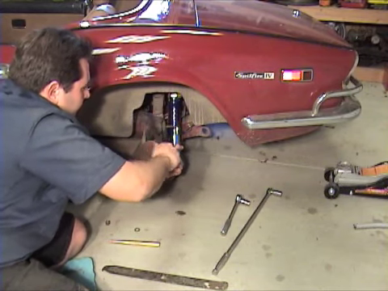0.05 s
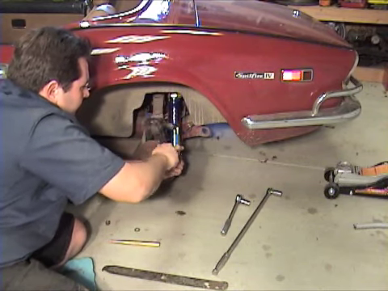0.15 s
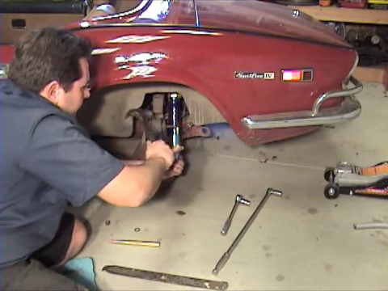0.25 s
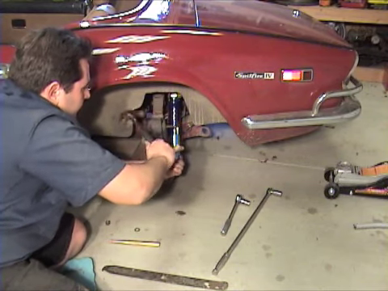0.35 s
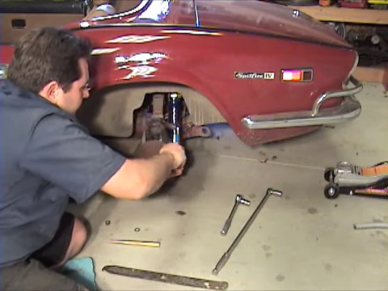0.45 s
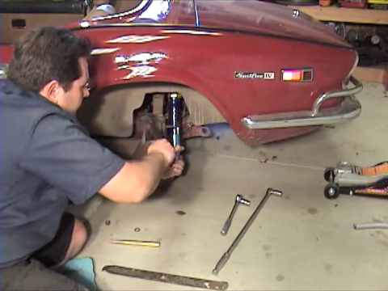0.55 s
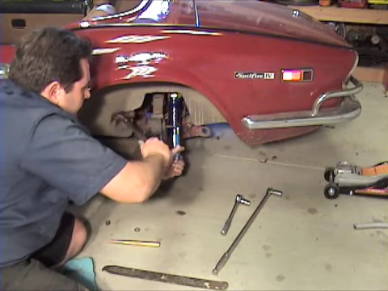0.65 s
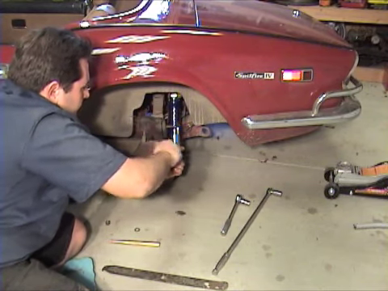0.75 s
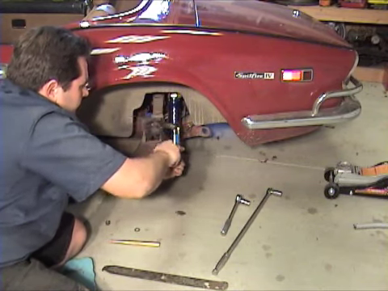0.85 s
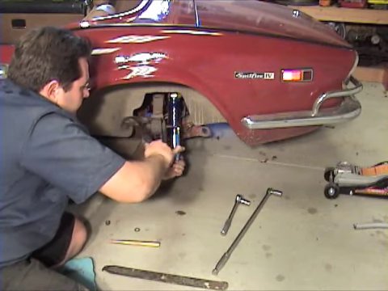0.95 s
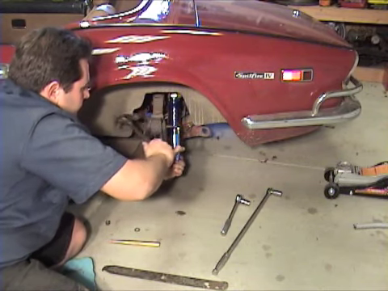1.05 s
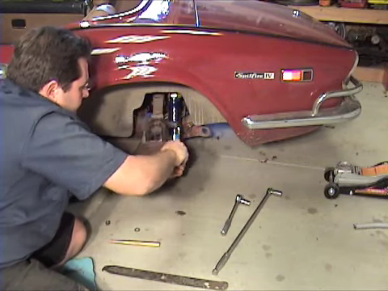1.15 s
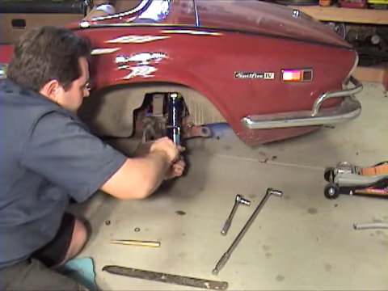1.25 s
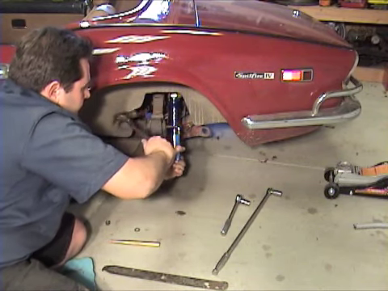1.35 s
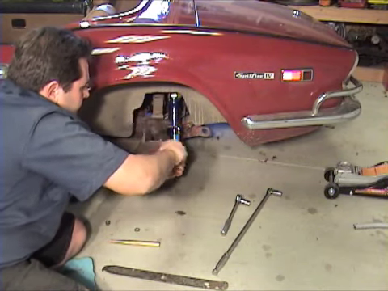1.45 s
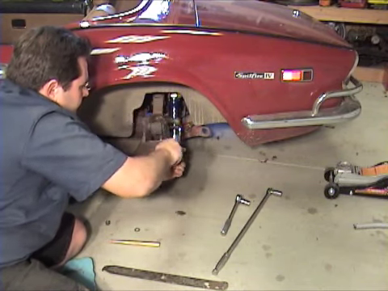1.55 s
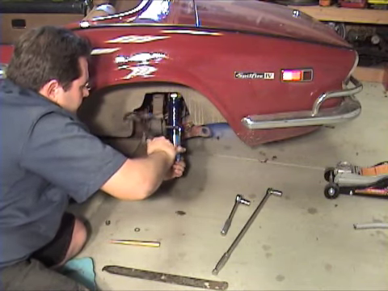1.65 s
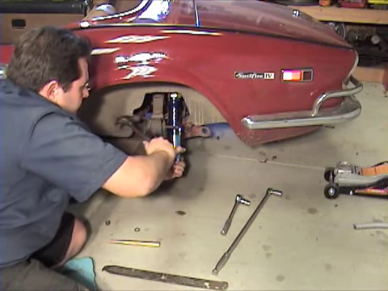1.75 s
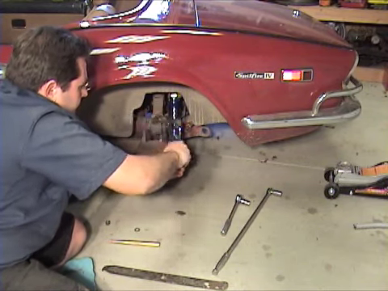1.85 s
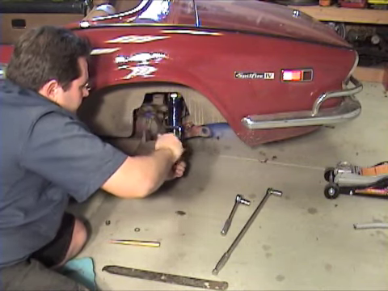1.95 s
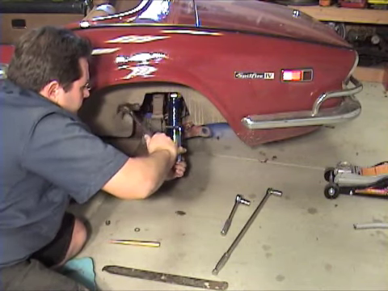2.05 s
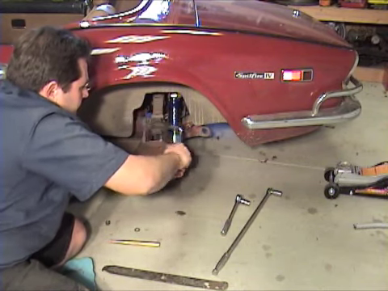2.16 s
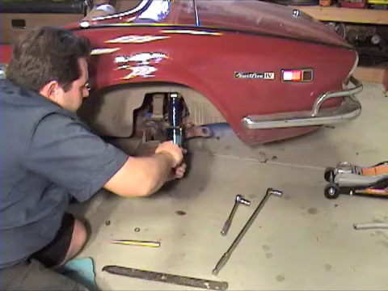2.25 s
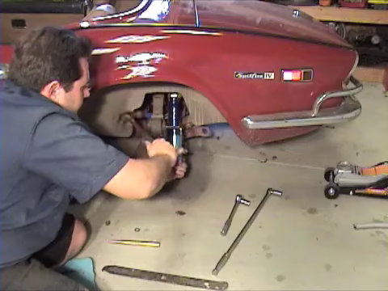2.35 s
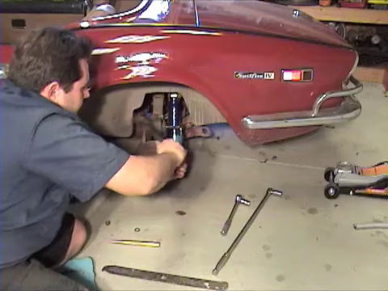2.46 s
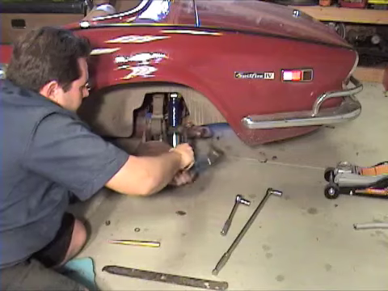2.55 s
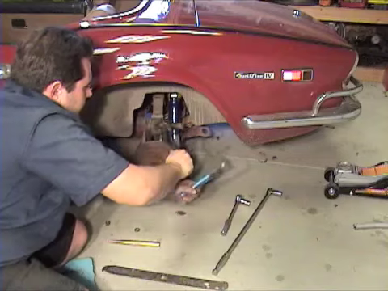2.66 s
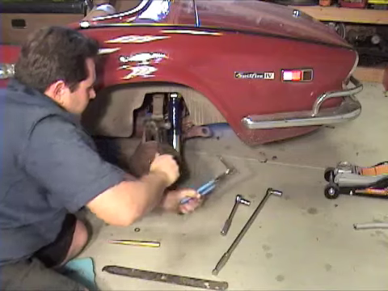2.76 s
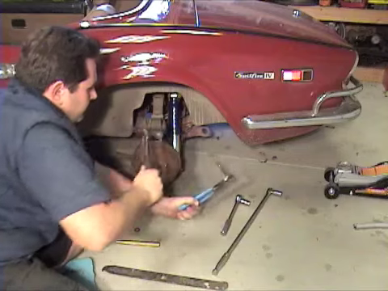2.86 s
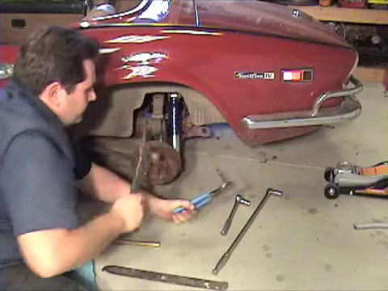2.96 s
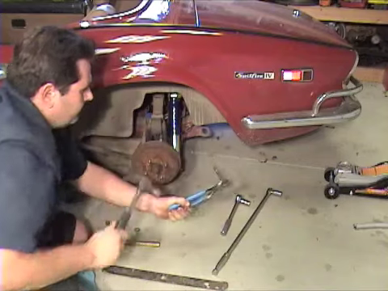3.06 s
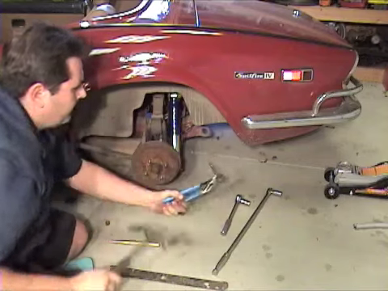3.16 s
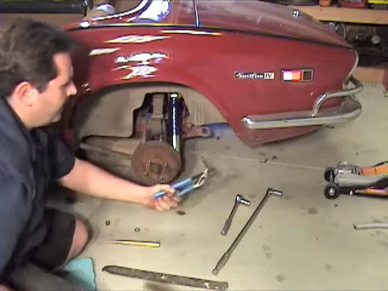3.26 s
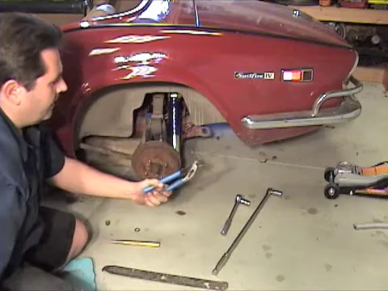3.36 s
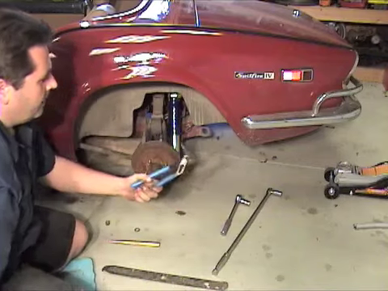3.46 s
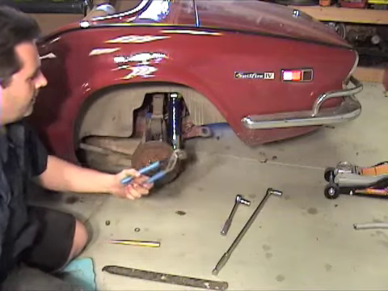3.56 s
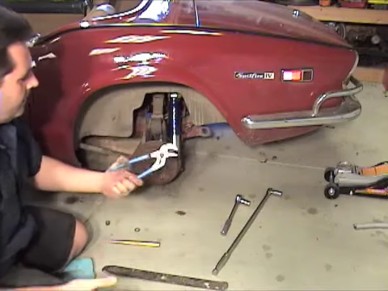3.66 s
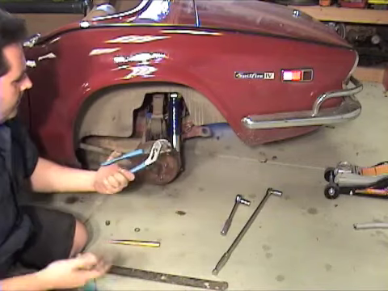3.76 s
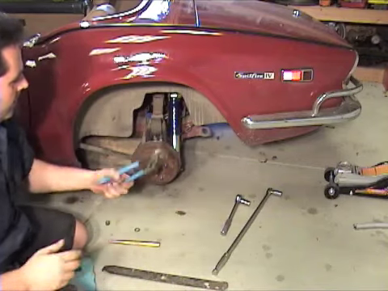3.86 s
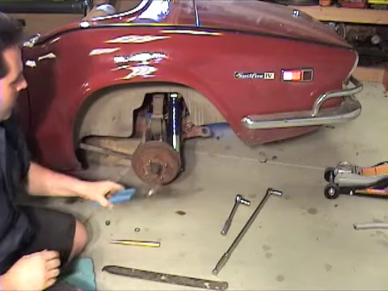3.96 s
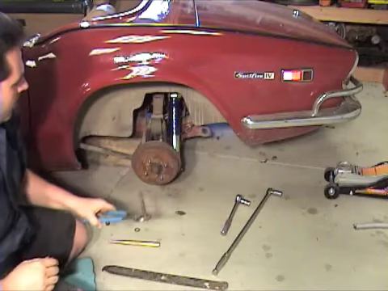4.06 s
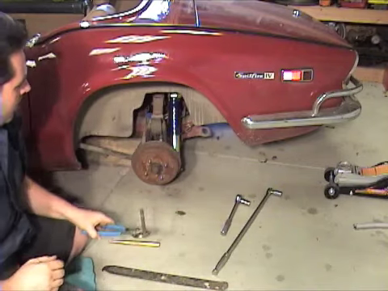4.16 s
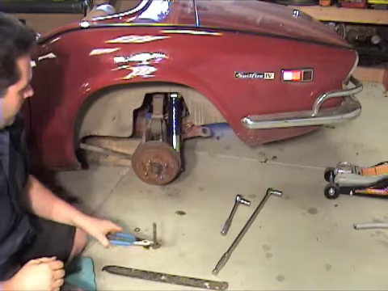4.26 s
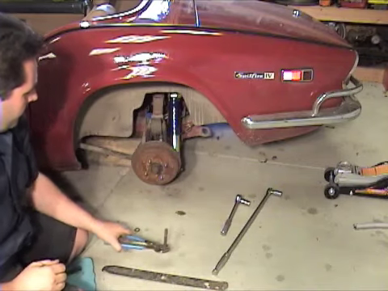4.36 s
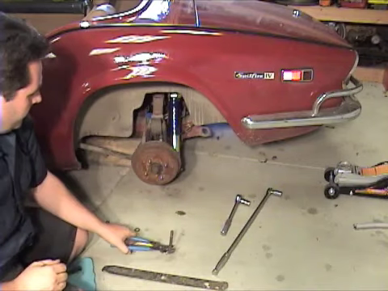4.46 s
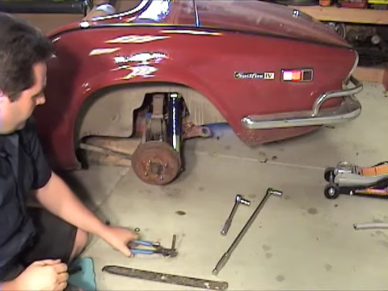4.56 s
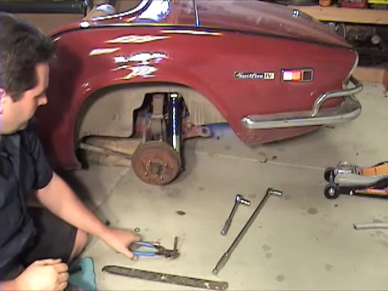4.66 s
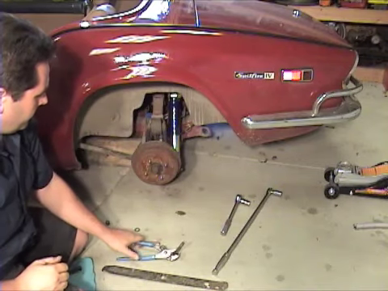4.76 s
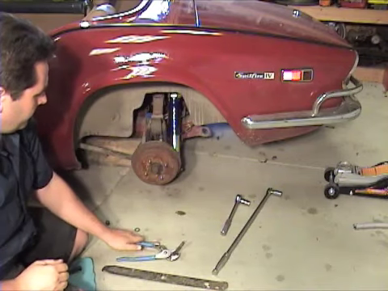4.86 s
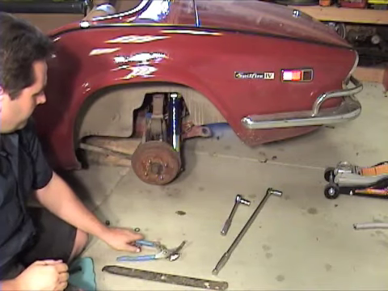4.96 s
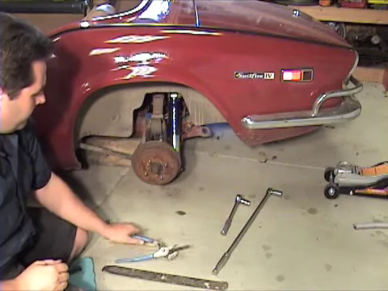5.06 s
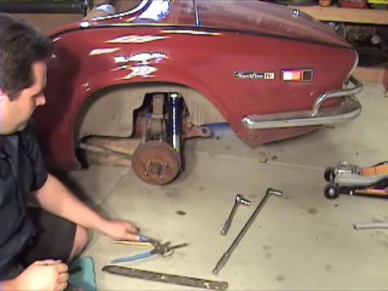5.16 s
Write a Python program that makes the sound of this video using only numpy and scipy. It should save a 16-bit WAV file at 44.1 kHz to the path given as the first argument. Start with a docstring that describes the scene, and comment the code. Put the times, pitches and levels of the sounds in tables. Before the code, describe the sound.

The decaying ring of an earlier blow opens the sound. From 0.2 seconds a hammer hits steel pliers clamped in a car's suspension, with blows near 0.2, 0.55, 0.9, 1.25, 1.57, 1.93, 2.28 and 2.61. Each is a short, chattering, hard clank with a low hollow boom from the body panels and a garage tail of under a second. Tone varies: the 1.25 blow is brightest, while those at 1.57 and 1.93 are dull, glancing and quickly double-hit. The level ducks at loud blows, then the room swells back. The ring fades to quiet; around 3.4 to 3.65 the hammer goes down on concrete with a light click, a firmer knock, rapid tiny rocking taps and soft thumps until about 3.9. Faint clothing rustles come near 3.4 and 4.5. Pliers clink brightly in small clusters at 4.7-4.9 and 5.1-5.15. Low room air and very faint hum lie beneath.

```python
"""A hammer taps locking pliers clamped on a stuck bolt in a car's suspension, about three blows a second.
Each blow is chattering noise coloured by the steel's resonances, plus booming modes of the car's panels.
The hammer is then laid on the garage's concrete floor, knocking and rocking; the pliers follow with a jingle.
Under it: shaped noise for air and rustling clothes, and sines for a faint hum.
Gain control ducks at loud blows and recovers, so the room swells up behind them."""
import sys
import numpy as np
from scipy import signal
from scipy.fft import rfft, irfft, next_fast_len
from scipy.io import wavfile
from scipy.ndimage import map_coordinates

SR = 44100
rng = np.random.default_rng(int(sys.argv[2]) if len(sys.argv) > 2 else 0)


def master_out(mix):
    """Clip the mix to full scale and print it as 16-bit PCM to the path in sys.argv[1]."""
    frames = np.transpose(np.atleast_2d(mix))
    ceiling = np.clip(frames, -1, 1)
    pcm = np.round(ceiling * 32767).astype(np.int16)
    wavfile.write(sys.argv[1], SR, pcm)


N = 229320
SIZE = 2 ** 16  # samples in one contact sound
T = np.arange(SIZE) / SR
HZ = np.fft.rfftfreq(SIZE, 1 / SR)


def amp(db):
    """Amplitude ratio of a level in dB."""
    return 10 ** (np.asarray(db) / 20)


def unit(x):
    """Scale to rms 1."""
    return x / np.sqrt(np.mean(x ** 2) + 1e-20)


def along(points, hz):
    """Interpolate (Hz, value) points on a log frequency axis."""
    point_hz, values = np.transpose(points)
    return np.interp(np.log(hz + 1), np.log(point_hz + 1), values)


def fade(t60_s):
    """Exponential decay of 60 dB in t60_s."""
    return np.exp(-np.log(1000) * T / max(t60_s, 1e-4))


def swell(rise_s):
    """Exponential onset with time constant rise_s."""
    return 1 - np.exp(-T / max(rise_s, 1e-5))


def filtered(x, response):
    """Apply a zero-phase gain that depends on frequency."""
    size = next_fast_len(N + SR // 2)
    gain = response(np.fft.rfftfreq(size, 1 / SR))
    return irfft(rfft(x, size) * gain, size)[..., :N]


def radiated(x, gain):
    """Filter x at minimum phase: a body rings only after it is struck."""
    cepstrum = irfft(np.log(np.maximum(gain, 1e-6)))
    cepstrum[1:SIZE // 2] *= 2
    cepstrum[SIZE // 2 + 1:] = 0
    return irfft(rfft(x) * np.exp(rfft(cepstrum)))


def add(track, start_s, sound):
    """Mix a sound into the track, cut at the track's ends."""
    start = round(start_s * SR)
    a, b = max(start, 0), min(start + SIZE, N)
    track[:, a:b] += sound[:, a - start:b - start]


def panned(x, left_db):
    """Lean a stereo sound left: left minus right gain is left_db."""
    return x * amp([[left_db / 2], [-left_db / 2]])


def colour(spectrum, bright_db, corner_hz=5000):
    """Contact spectrum; harder contacts carry more treble."""
    shelf = 1 - 1 / (1 + ((HZ / corner_hz) ** 2) ** 2)
    return unit(amp(along(spectrum, HZ))) * amp(bright_db * shelf)


def resonant(modes):
    """Gain of an object whose modes stand out of its broad response."""
    peaks = sum(amp(2 * db) / (1 + (2 * (HZ - hz) / width_hz) ** 2) for hz, width_hz, db in modes)
    return np.sqrt(1 + peaks)


def minor_modes(depth_db=1.5, spacing_hz=45):
    """Many weak resonances, excited differently by every contact."""
    ripple = map_coordinates(rng.standard_normal(len(HZ)), [HZ / spacing_hz])
    return unit(amp(depth_db * ripple))


# Reverberation. Each row: frequency in Hz, t60 in s.
GARAGE_T60 = [(60, .85), (250, 0.76), (1000, 0.76), (3500, .72), (7000, 0.49), (10000, 0.43), (15000, 0.33)]
# Stereo width of the reverberation. Each row: frequency in Hz, side gain in dB.
GARAGE_WIDTH = [(30, -7), (60, -4), (200, -21.5), (500, -12.5), (1500, -7), (5000, -5), (9000, -3),
                (12000, -17.5)]


def in_garage():
    """Fresh diffuse stereo tail, its mid of energy 1; the treble dies first."""
    hz, t, z = signal.stft(rng.standard_normal((2, SIZE)), SR, nperseg=256)
    z = z * np.exp(-np.log(1000) * t / along(GARAGE_T60, hz)[:, None])
    z[1] *= amp(along(GARAGE_WIDTH, hz))[:, None]
    mid, side = signal.istft(z, SR, nperseg=256)[1][:, :SIZE] * swell(0.0017)
    return np.array([mid + side, mid - side]) / np.linalg.norm(mid)


def contact(gain, t60_s, wet_db, early_db=-14, early_t60_s=.06, side_db=-12, rise_s=0.00069,
            near_bass_db=0):
    """A contact chatters, scatters off nearby surfaces and fills the garage, in the object's colour."""
    envelope = np.hypot(fade(t60_s), amp(early_db) * fade(early_t60_s)) * swell(rise_s)
    mid, side = rng.standard_normal((2, SIZE)) * envelope
    near = np.array([mid + amp(side_db) * side, mid - amp(side_db) * side])
    near = radiated(near, amp(near_bass_db / (1 + (HZ / 2000) ** 2)))  # small parts radiate little bass
    room = amp(wet_db) * np.linalg.norm(envelope) * in_garage()
    return radiated(near + room, gain * minor_modes())


def rush(spectrum, side_db):
    """Steady stereo noise of rms 1."""
    mid, side = filtered(rng.standard_normal((2, N)), lambda hz: amp(along(spectrum, hz)))
    return unit(np.array([mid + amp(side_db) * side, mid - amp(side_db) * side]))


# Room air. Each row: frequency in Hz, gain in dB.
AIR_SPECTRUM = [(25, -9.5), (66, -0.5), (120, -4.5), (200, -1), (300, -2.5), (450, -2.5), (700, -2.5),
                (1100, -4), (1600, -10), (2400, -10.5), (4000, -15.5), (8000, -21), (11000, -21),
                (15500, -40.5)]
# Electrical hum. Each row: frequency in Hz, rms level in dB before panning.
HUM_TONES = [(242.2, -63.5), (479.1, -78), (543.7, -67), (958.2, -76.5)]
# Clothes. Each row: frequency in Hz, gain in dB.
CLOTH_SPECTRUM = [(200, -11.5), (1200, 7.5), (5000, 0.5), (9000, -1), (12000, -9.5), (15000, -26)]
# Arm movements. Each row: peak time in seconds, level in dB.
ARM_REACHES = [(3.39, -56), (4.48, -56.5), (4.8, -60)]
RUSTLE_DB_PER_S = 75  # rise and fall around each peak


def background():
    """Noise for room air, sines for hum, and noise for clothes that rustle with the arm."""
    t = np.arange(N) / SR
    hum = sum(amp(db) * np.sqrt(2) * np.sin(2 * np.pi * (hz * t + rng.random())) for hz, db in HUM_TONES)
    motion = sum(amp(db - RUSTLE_DB_PER_S * np.abs(t - peak_s)) for peak_s, db in ARM_REACHES)
    air = amp(-56.0) * rush(AIR_SPECTRUM, side_db=-0.5)
    return air + hum + motion * rush(CLOTH_SPECTRUM, side_db=-8.5)


# Pliers clinking on the floor. Each row: start in seconds, level in dB, brightness in dB.
PLIERS_CLINKS = [(4.695, -25.5, -23), (4.818, -34.5, -2.5), (4.8405, -25.5, -7), (4.8601, -21.5, -9),
                 (4.877, -22.5, 0.5), (5.100, -36.5, -8), (5.132, -27, 2.5), (5.152, -18.5, 3)]
# Clink spectrum. Each row: frequency in Hz, gain in dB.
JINGLE_SPECTRUM = [(30, -30), (150, -4.5), (400, -3), (900, -6.5), (1600, -2.5), (2100, -3.5), (2800, 1),
                   (4100, -1.5), (5300, 2), (7000, 10), (8800, -5.5), (10500, 0), (12500, -20),
                   (15500, -24)]
# Modes of the loose pliers. Each row: frequency in Hz, width in Hz, boost in dB.
PLIERS_MODES = [(1575, 53, 10.5), (2800, 39, 8), (4760, 45, 9), (5200, 50, 11), (5290, 62, 9),
                (6700, 53, -3.5), (7100, 58, -4), (8060, 70, 6), (10340, 73, -2)]
RATTLE_S, RATTLE_LOSS_DB, RATTLE_BRIGHTER_DB = .0055, 7, 4  # lever strikes once more after each clink


def pliers_down():
    """Jaws and handles clink on the floor, exciting the pliers' modes; the lever rattles after each."""
    out = np.zeros((2, N))
    loose = resonant(PLIERS_MODES)
    rattles = [(s + RATTLE_S, db - RATTLE_LOSS_DB, bright_db + RATTLE_BRIGHTER_DB)
               for s, db, bright_db in PLIERS_CLINKS]
    for s, db, bright_db in PLIERS_CLINKS + rattles:
        gain = colour(JINGLE_SPECTRUM, bright_db) * loose
        add(out, s, amp(db) * contact(gain, 0.03, wet_db=-5, early_db=-11.5, early_t60_s=0.15))
    return out


# Hammer knocks on the floor, handle first, then head.
# Each row: start in seconds, level in dB, brightness in dB, pitch in Hz.
HAMMER_KNOCKS = [(3.3830, -49.5, 7, 3500), (3.4583, -21.5, 0, 2280), (3.516, -14.5, -5, 1500),
                 (3.6324, -35.5, 13, 9800)]
ROCK_S, ROCK_LOSS_DB, ROCK_BRIGHTER_DB = .0275, 6.7, 3.3  # from one touch to the next
ROCK_HZ = 2500


def rocking(count):
    """After its hardest knock the head rocks in even, ever lighter and brighter touches."""
    s, db, bright_db, _ = max(HAMMER_KNOCKS, key=lambda knock: knock[1])
    return [(s + k * ROCK_S, db - k * ROCK_LOSS_DB, bright_db + k * ROCK_BRIGHTER_DB, ROCK_HZ)
            for k in range(1, count + 1)]


# Knock spectrum. Each row: frequency in Hz, gain in dB.
KNOCK_SPECTRUM = [(30, -49), (150, -9), (450, -8.5), (800, -1.5), (1600, -3), (2100, -1.5), (3000, -1.5),
                  (3800, -10.5), (5600, -12.5), (7500, -28), (11000, -30.5), (15000, -57)]
# Modes of the hammer. Each row: frequency in Hz, width in Hz, boost in dB.
HAMMER_MODES = [(470, 36, 13.5), (1670, 104, 9), (2080, 70, -10), (2870, 120, 0), (5400, 80, -6),
                (9620, 130, 15)]
# Dull thumps of the settling handle. Each row: start in seconds, level in dB.
HANDLE_THUMPS = [(3.543, -32), (3.632, -27), (3.763, -38), (3.792, -41), (3.862, -45)]
# Thud spectrum, shared with the car's panels. Each row: frequency in Hz, gain in dB.
THUD_SPECTRUM = [(15, -45), (38, -19.5), (55, -3), (100, -6.5), (170, 2.5), (280, 3.5), (400, 0), (600, -3),
                 (1200, -8.5), (4000, -80.5)]


def hammer_down(soft_hz=600):
    """Handle, then head knock on concrete, ringing the hammer's modes; head rocks, handle thumps to rest."""
    out = np.zeros((2, N))
    hammer = resonant(HAMMER_MODES)
    for s, db, bright_db, hz in HAMMER_KNOCKS + rocking(count=3):
        pitch = resonant([(hz, 0.35 * hz, 7)])
        gain = colour(KNOCK_SPECTRUM, bright_db, corner_hz=3630) * hammer * pitch
        knock = contact(gain, 0.0071, wet_db=-6.5, early_db=-15, early_t60_s=0.069, rise_s=0.00016)
        add(out, s, amp(db) * knock)
    # small and soft: little bass, little treble
    dull = colour(THUD_SPECTRUM, 0) * (HZ / (HZ + 110)) ** 2 / (1 + (HZ / soft_hz) ** 2)
    for s, db in HANDLE_THUMPS:
        add(out, s, amp(db) * contact(dull, 0.093, wet_db=-0.5, rise_s=0.0013))
    return out


def ring(modes, scatter_db=2):
    """Damped modes, each excited and tuned a little differently at every blow."""
    chance = rng.standard_normal((len(modes), 2))
    total = 0
    for (hz, db, t60_s), (a, b) in zip(modes, chance):
        tone = np.sign(b) * np.sin(2 * np.pi * hz * (1 + .002 * b) * T)
        total = total + amp(db + scatter_db * a) * fade(t60_s) * tone
    return total


# Car body panels. Each row: frequency in Hz, level in dB, t60 in s.
PANEL_MODES = [(52.8, -18.5, 0.51), (80.8, -9.5, 0.99), (121, -12, 0.5), (157.5, -4, 0.78),
               (175.7, -5.5, 0.93), (186.6, -13, 0.44), (233, -1.5, 0.49), (275, 3.5, 0.78), (291, -2, .6),
               (325.7, 0, 0.43), (357, -10.5, 0.23), (461, -5, 0.72)]
BOOM_WIDTH_HZ, BOOM_DB, BOOM_RISE_S = 80, 1.5, .012  # each blow favours one band


def panels(boom_hz):
    """The car's heavy panels are slow to get going, then boom."""
    thud = radiated(in_garage(), colour(THUD_SPECTRUM, 0))
    shaken = amp(-29.5) * ring(PANEL_MODES) + amp(11) * thud
    return radiated(shaken * swell(BOOM_RISE_S) ** 3, resonant([(boom_hz, BOOM_WIDTH_HZ, BOOM_DB)]))


# Steel on steel. Each row: frequency in Hz, gain in dB.
CRACK_SPECTRUM = [(35, -17), (110, -8), (400, -14), (700, -13), (1300, -5), (2600, -2.5), (4200, 0),
                  (5200, -1), (7800, 1.5), (10000, -5), (12500, -15), (15500, -31)]
# Pliers and suspension arm, damped by the hand. Each row: frequency in Hz, width in Hz, boost in dB.
STEEL_MODES = [(417, 14, 3), (874, 35, 11), (1158, 37, 7.5), (1386, 19, 4.5), (1596, 110, 4), (1780, 74, 1),
               (2196, 57, 3), (2600, 110, 2), (3003, 71, -0.5), (3650, 240, 2), (4130, 96, -5.5),
               (5400, 61, 0.5), (6770, 47, -3), (7340, 34, -6), (7460, 52, -8), (9250, 68, -4.5)]
CHATTER_S, CHATTER_HALVES_DB = .0225, 9.5  # t60 at 0 dB brightness; halves with this much more


def steel_contact(bright_db, clank_db, jaw_hz, jaw_db, clank_hz=1400, jaw_width_hz=170):
    """The hammer chatters on the pliers, briefly when square and bright; jaw note shifts with the grip."""
    clank = amp(clank_db * np.exp(-np.log2((HZ + 1) / clank_hz) ** 2))
    jaws = resonant([(jaw_hz, jaw_width_hz, jaw_db)])
    gain = colour(CRACK_SPECTRUM, bright_db) * clank * resonant(STEEL_MODES) * jaws
    chatter_s = CHATTER_S * 2 ** (-bright_db / CHATTER_HALVES_DB)
    return contact(gain, chatter_s, wet_db=-6, early_db=-9.5, early_t60_s=0.073, near_bass_db=-4.5)


# Hammer blows on the pliers. Each row: start in seconds, strength in dB, share passed to the car in dB,
# brightness in dB, jaw note in Hz, jaw ring in dB, boom in Hz.
BLOWS = [(-.150, 5.5, -3.5, -0.5, 3830, 7, 320), (.1996, 3.7, -3.8, -4, 2720, 0.5, 265),
         (.5520, 3, -4.5, -4.5, 2630, 5, 280), (.8960, 2.2, -2.5, 2.5, 4550, 0, 235),
         (1.2445, -0.3, -0.5, 7.5, 4350, 7, 450), (1.5682, -2.5, -4, -12, 3735, 14.5, 270),
         (1.9253, -4, 0.5, -17.5, 2740, 6, 255), (2.278, 3.3, -6, -5.5, 1790, 4, 325),
         (2.6138, -0.3, -9.5, 2.5, 3540, 3.5, 355)]
# Stereo lean of the blows. Each row: frequency in Hz, left minus right in dB.
BLOW_LEAN = [(60, 1), (300, 2.4), (700, 2), (1400, 1.8), (2800, -1), (6000, 0.2)]
# The arm clanks more (dB per dB) the more of the blow it takes and the squarer it lands.
CLANK_DB, CLANK_GROWS, CLANK_PER_BRIGHT = 4.1, .55, .25
# A duller, glancing blow slips and catches again; the duller, the later.
GLANCING_BELOW_DB, SLIP_S, SLIP_S_PER_DB = -9, .0095, .00078
CATCH_DB, CATCH_BRIGHTER_DB = 3.5, 12  # second, square contact over the glancing one
CATCH_CLANK_DB, CATCH_JAW_DB, CATCH_CAR_DB = -3, 3.5, -4.5  # what it gives to arm, jaws and panels


def taps():
    """Each blow chatters through the steel and shakes the car's panels by way of the suspension."""
    out = np.zeros((2, N))
    for s, db, car_db, bright_db, jaw_hz, jaw_db, boom_hz in BLOWS:
        clank_db = CLANK_DB + CLANK_GROWS * car_db + CLANK_PER_BRIGHT * bright_db
        crack = steel_contact(bright_db, clank_db, jaw_hz, jaw_db)
        add(out, s, amp(db) * (crack + amp(car_db) * panels(boom_hz)))
        if bright_db < GLANCING_BELOW_DB:
            catch_s = s + SLIP_S - SLIP_S_PER_DB * bright_db
            catch = steel_contact(bright_db + CATCH_BRIGHTER_DB, CATCH_CLANK_DB, jaw_hz, CATCH_JAW_DB)
            add(out, catch_s, amp(db + CATCH_DB) * (catch + amp(CATCH_CAR_DB) * panels(boom_hz)))
    return filtered(out, lambda hz: amp(np.outer([.5, -.5], along(BLOW_LEAN, hz))))


def scene():
    """Mix the quiet garage, the tools laid down and the taps."""
    quiet = panned(background(), left_db=1)
    laid_down = panned(pliers_down(), left_db=1.0) + panned(hammer_down(), left_db=2)
    return quiet + laid_down + taps()


def record(dry, threshold_db=-4, release_db_per_s=110, attack_s=0.00047):
    """Gain control ducks fast and recovers steadily; what slips past is squashed, then band-limited."""
    recovery = release_db_per_s * np.arange(N) / SR
    excess = np.maximum(20 * np.log10(np.abs(dry).max(0) + 1e-9) - threshold_db, 0)
    held = np.maximum.accumulate(excess + recovery) - recovery
    pole = np.exp(-1 / (attack_s * SR))
    ducked = dry * amp(-signal.lfilter([1 - pole], [1, -pole], held))
    squashed = ducked / (1 + (ducked / .65) ** 4) ** .25
    # steep cut at 15500 Hz, gentler one at 13500 Hz
    return filtered(squashed, lambda hz: ((1 + (hz / 15500) ** 160) * (1 + (hz / 13500) ** 24)) ** -.5)


dry = scene()
out = record(dry)
master_out(out)
```